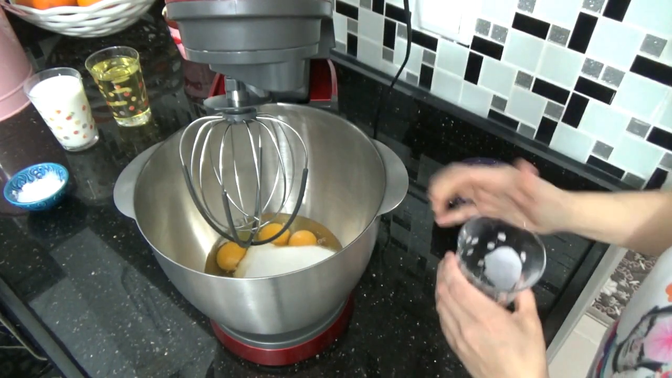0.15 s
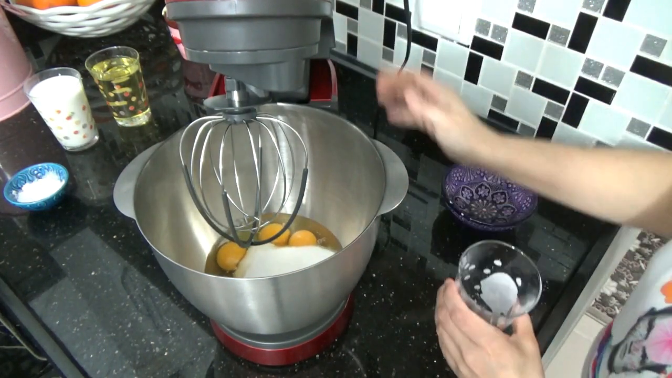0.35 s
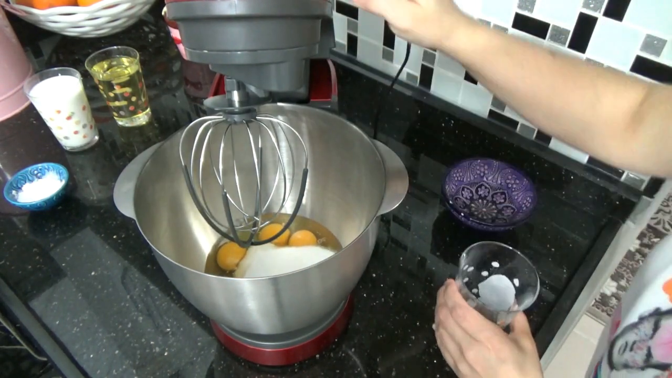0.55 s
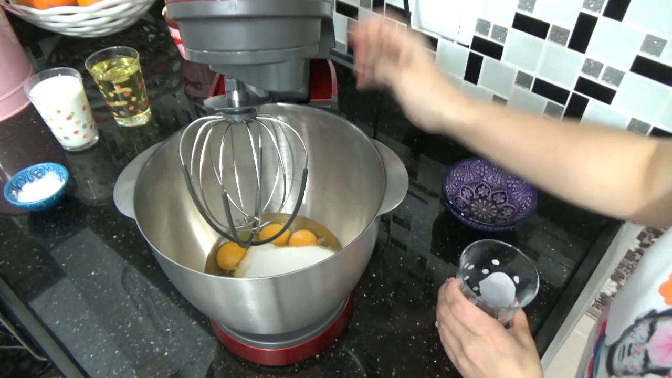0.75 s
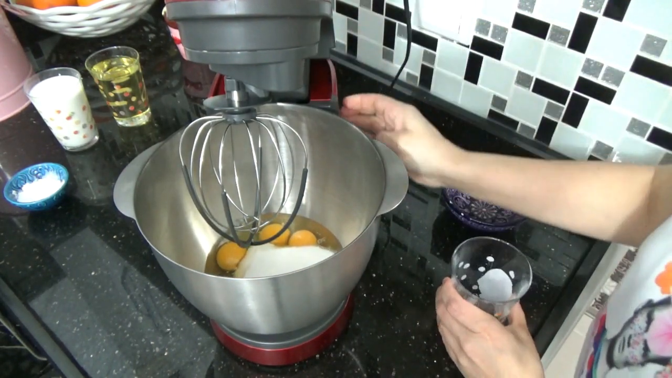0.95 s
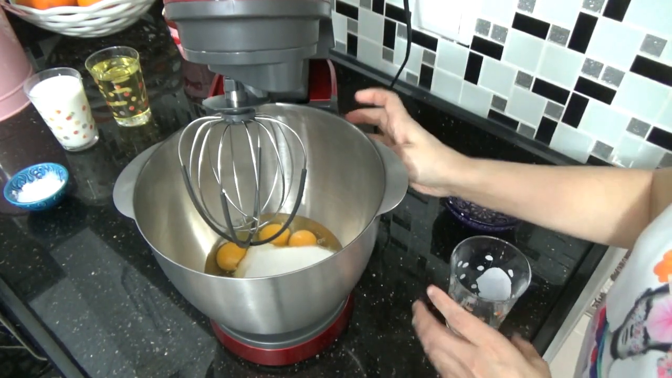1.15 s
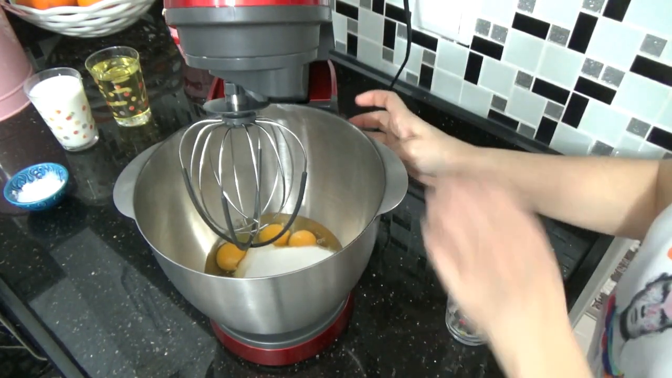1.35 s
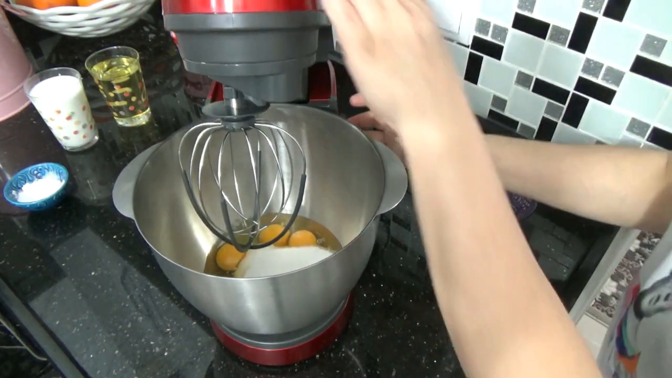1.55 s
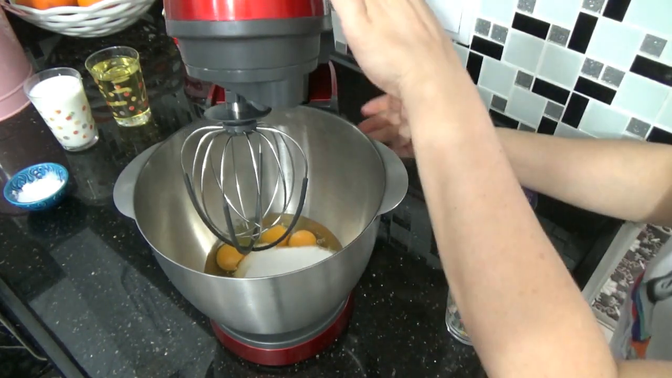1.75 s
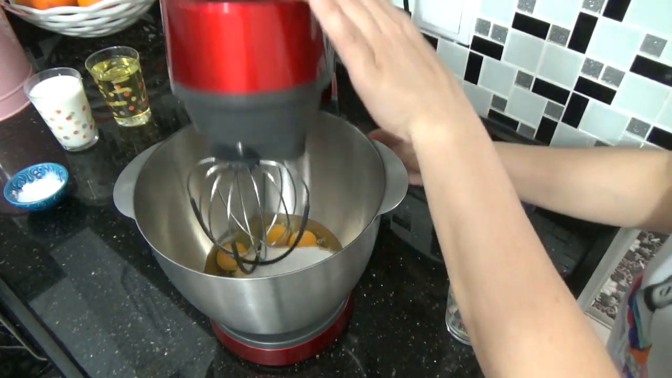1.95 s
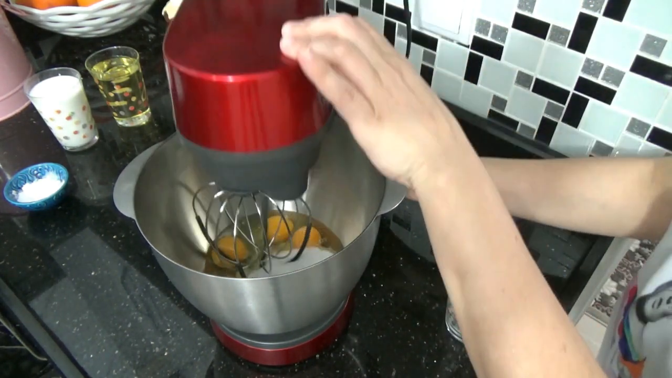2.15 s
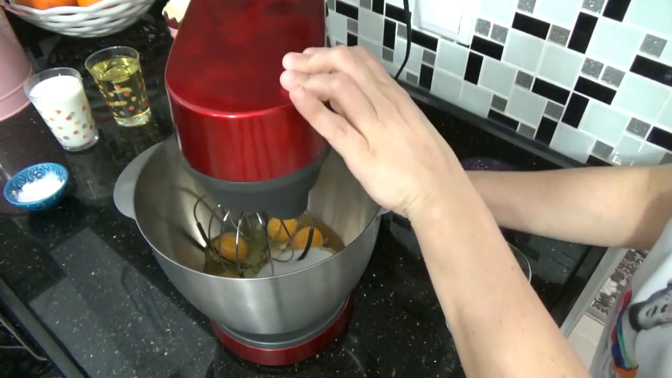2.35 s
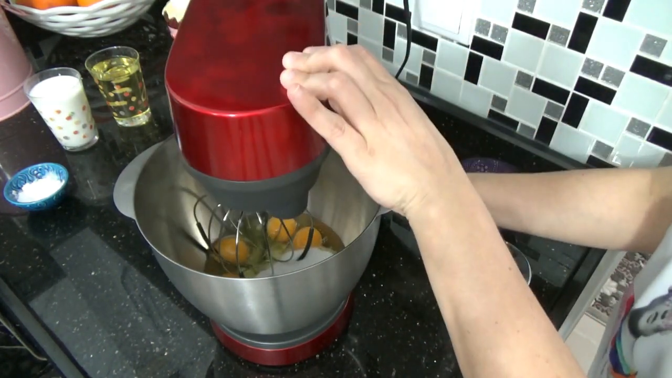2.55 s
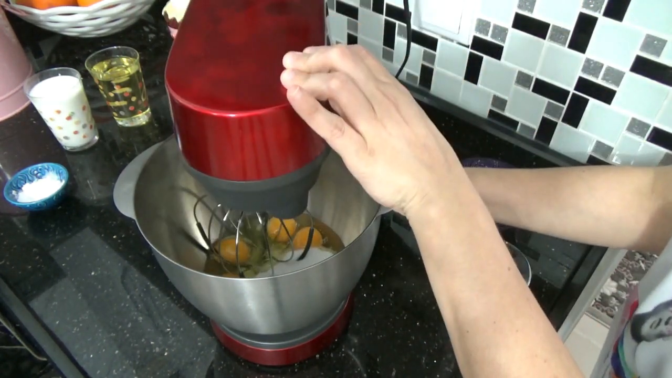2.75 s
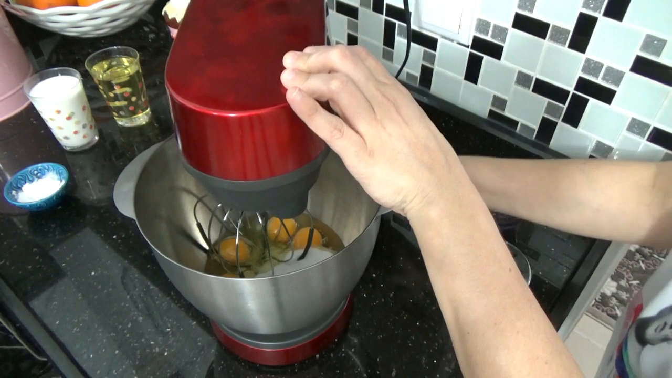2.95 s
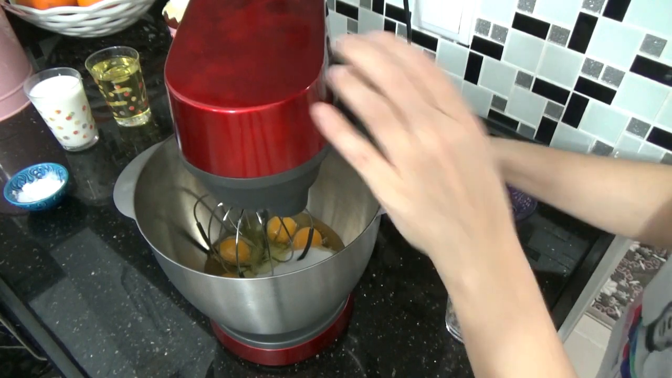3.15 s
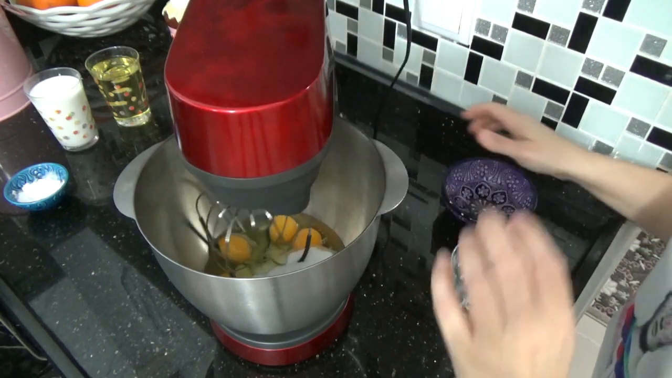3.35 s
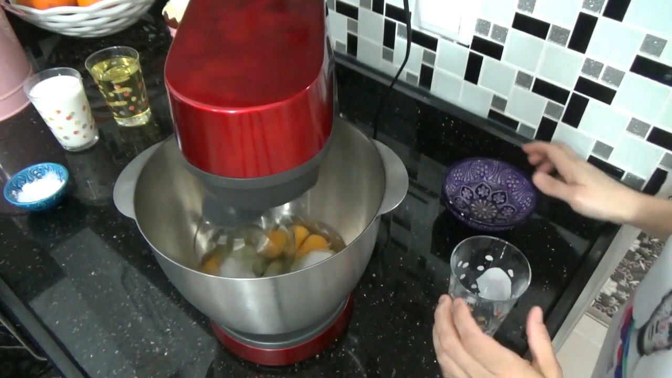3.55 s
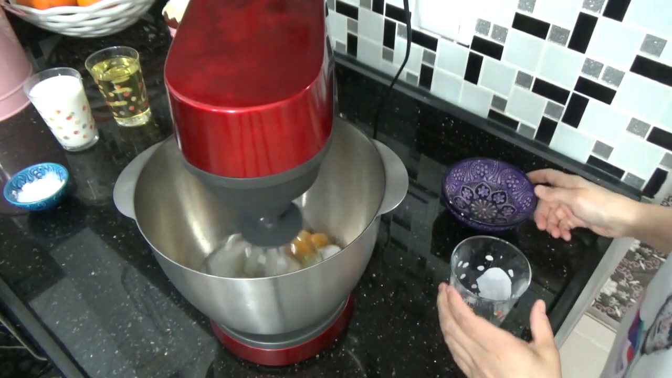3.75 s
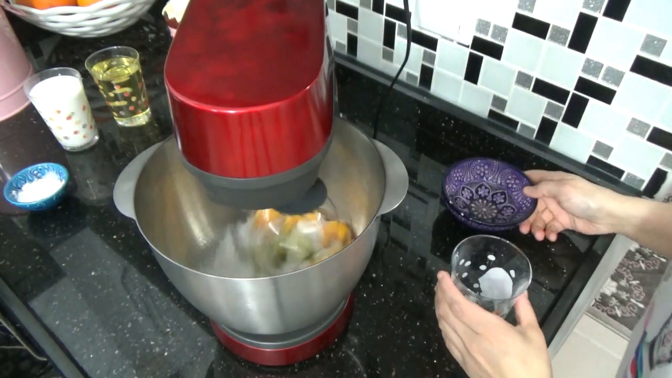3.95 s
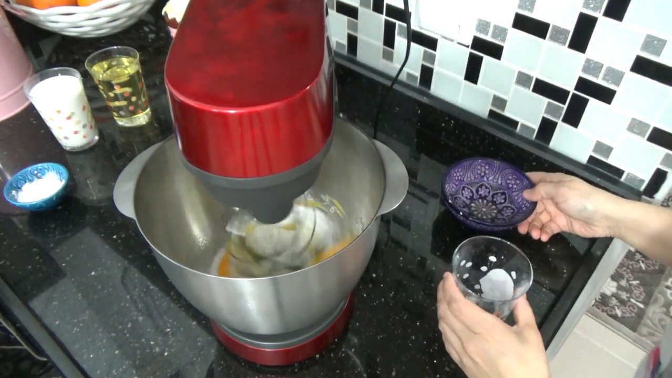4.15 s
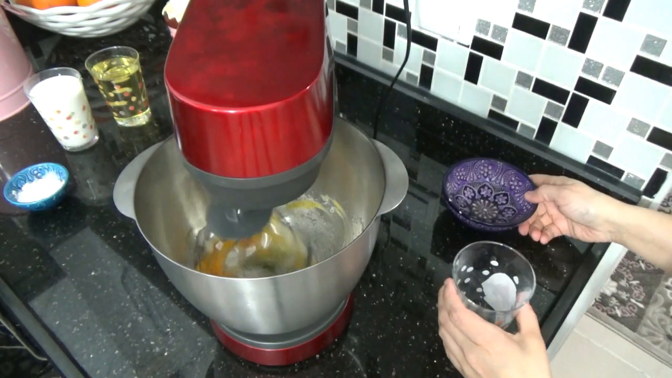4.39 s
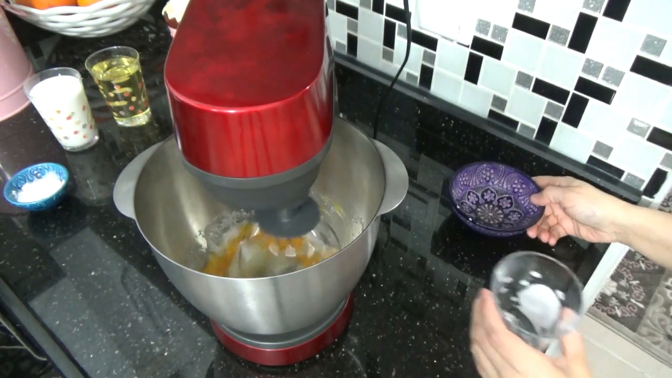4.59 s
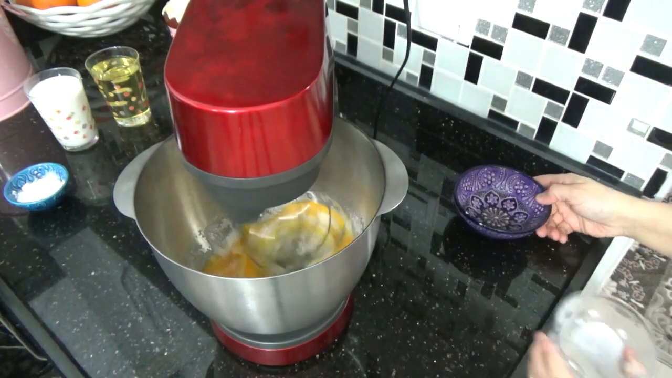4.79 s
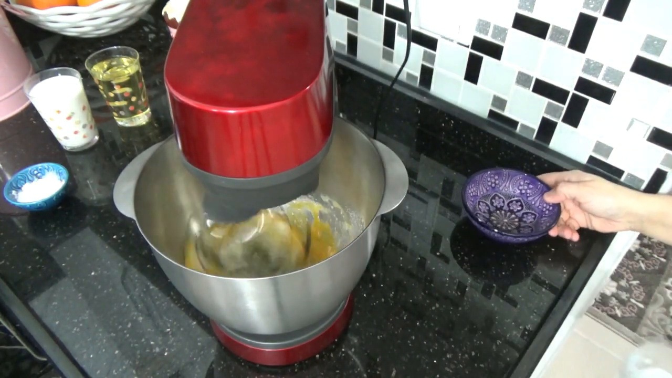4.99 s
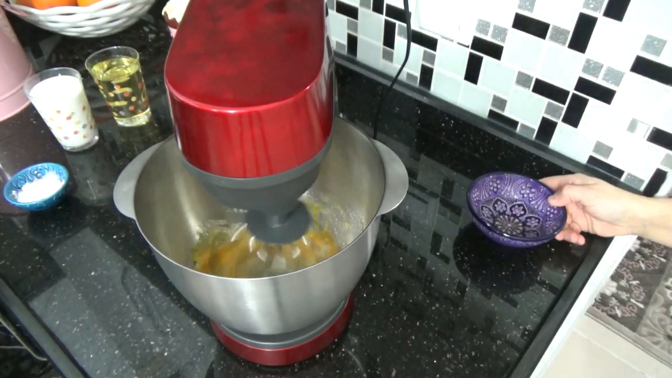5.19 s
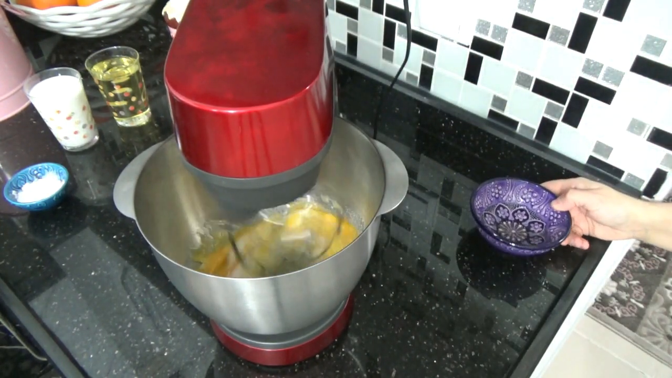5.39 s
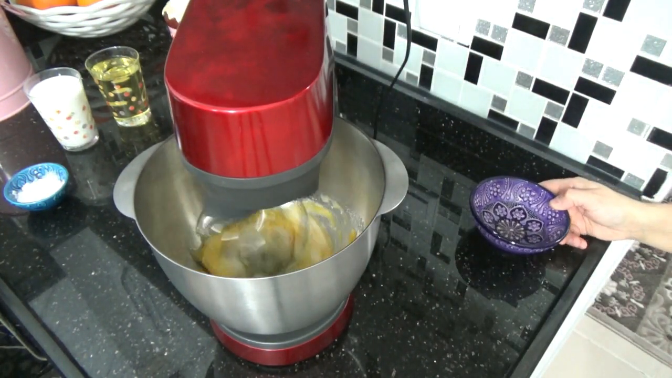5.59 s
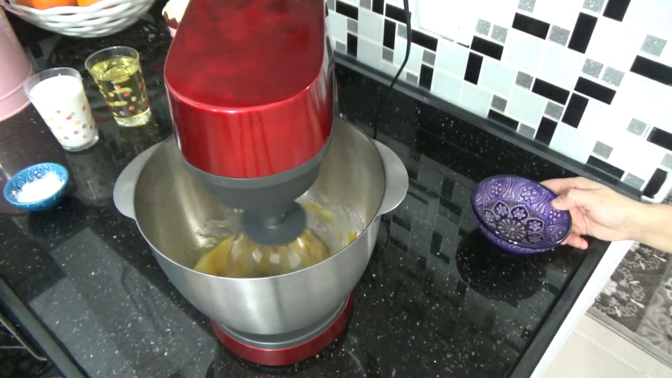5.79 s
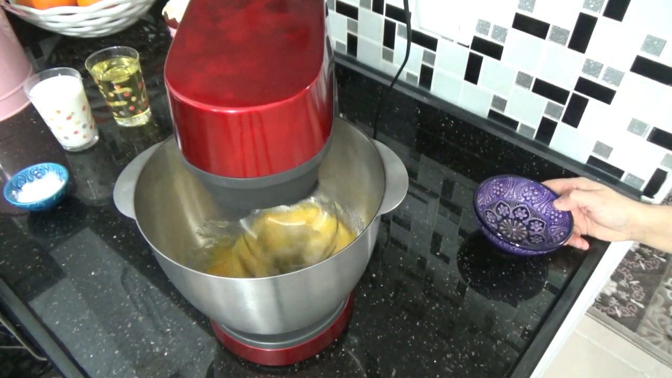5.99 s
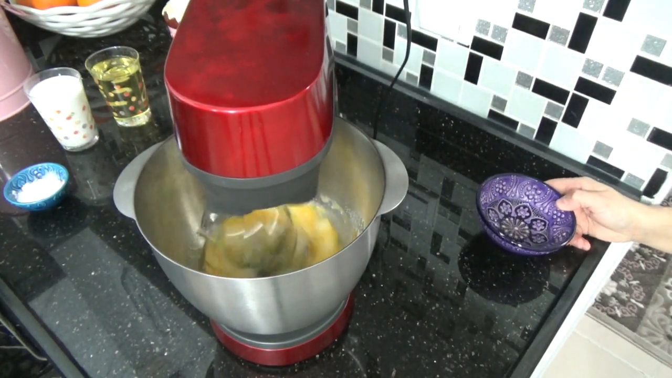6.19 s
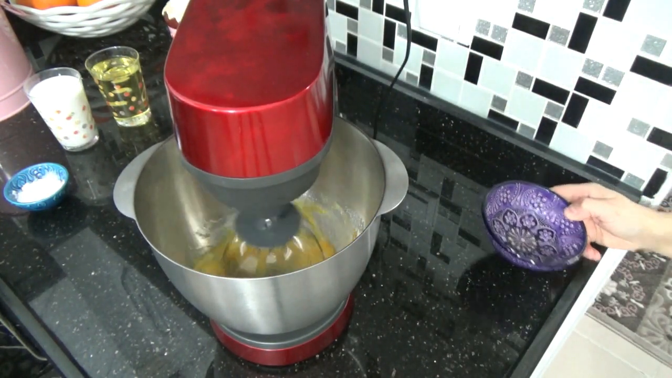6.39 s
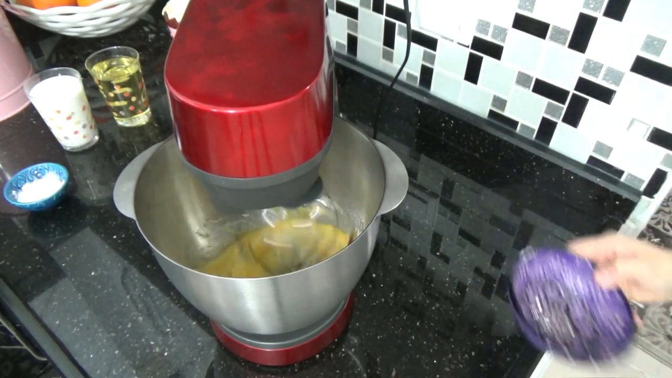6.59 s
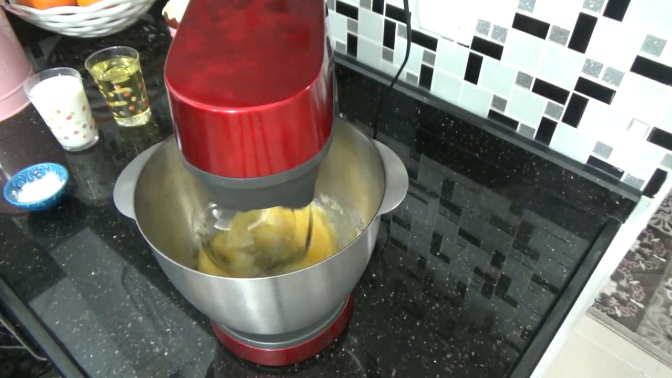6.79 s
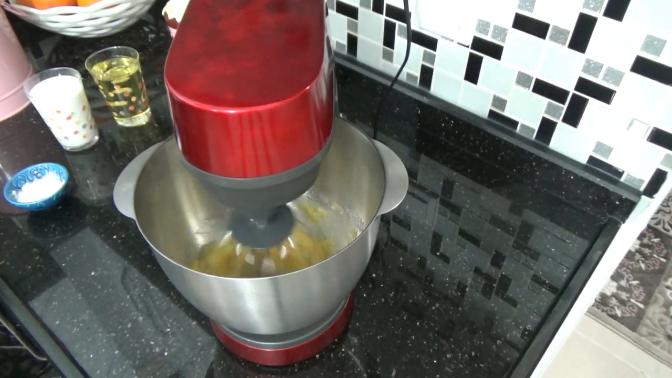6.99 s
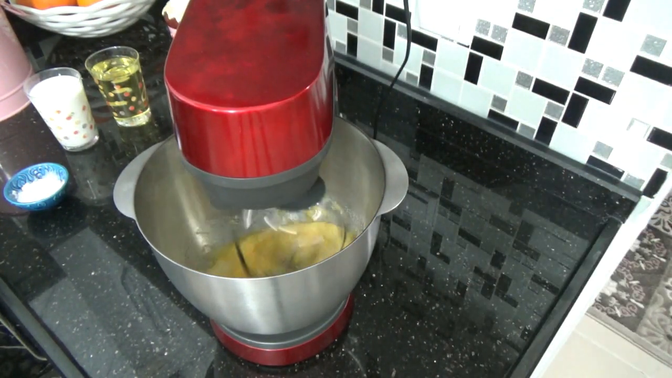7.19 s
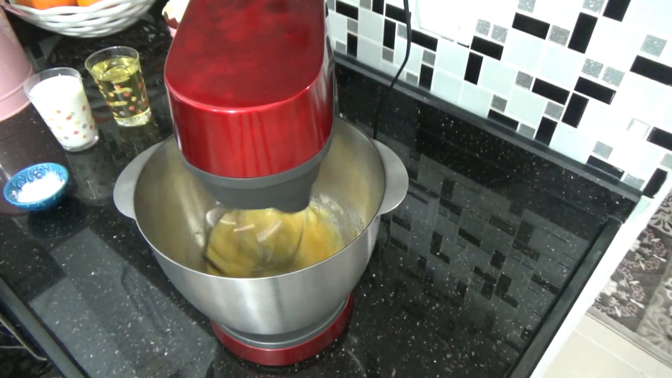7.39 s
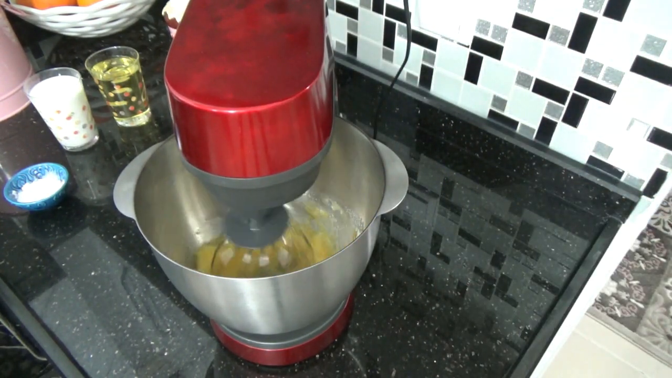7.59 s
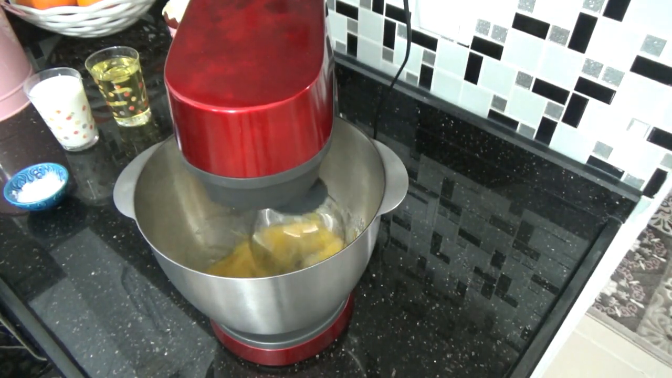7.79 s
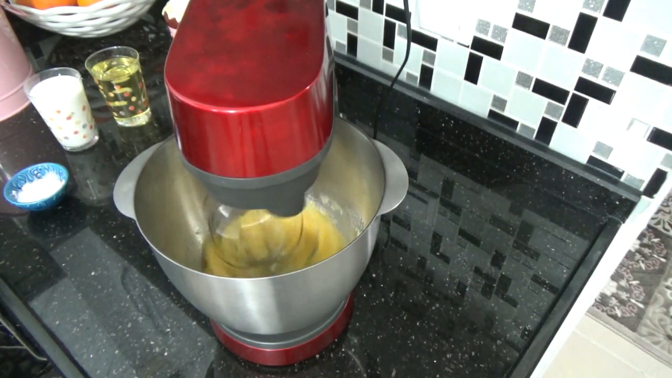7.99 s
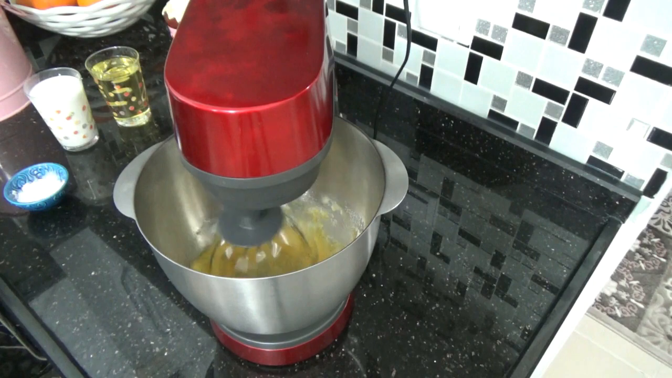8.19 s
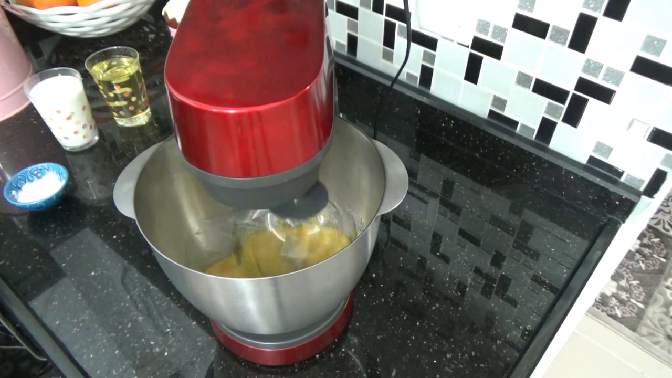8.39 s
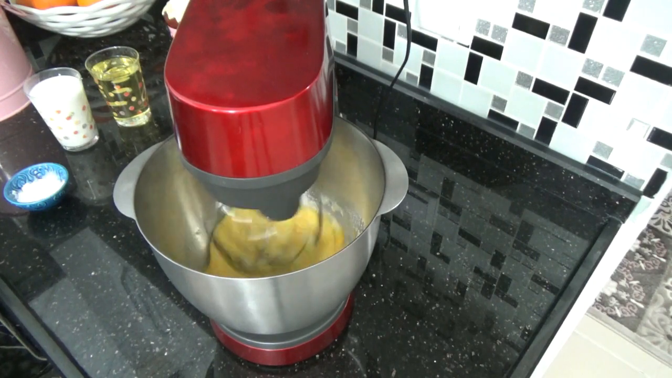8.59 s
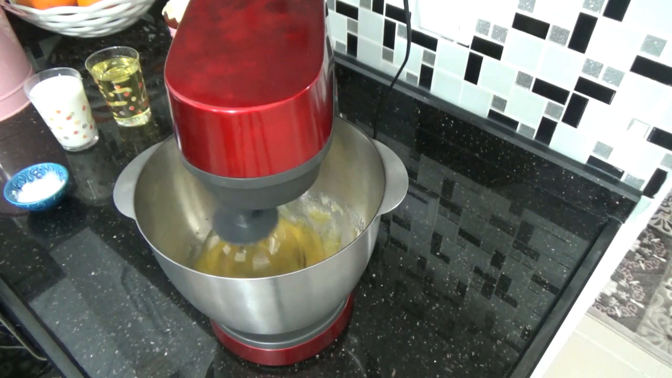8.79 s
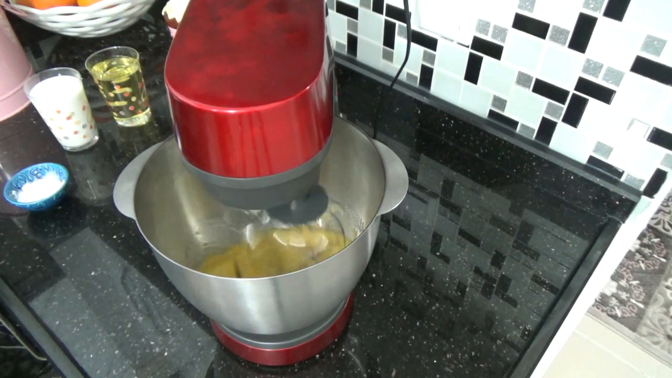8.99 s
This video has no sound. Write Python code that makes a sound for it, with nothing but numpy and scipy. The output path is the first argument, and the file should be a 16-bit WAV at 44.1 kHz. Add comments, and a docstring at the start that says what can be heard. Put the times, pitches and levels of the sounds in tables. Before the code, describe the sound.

A stand mixer's head clunks down into place, and its motor growls to life and speeds up into a steady, whining whir.

```python
"""A tiled kitchen, a stand mixer on its stone counter. A glass dish slides, the lever clacks, the head
tilts down and lands with a rattle, the knob clicks; the tiles answer each knock.
The motor growls and spins up in two steps: gears rattle and whine, brushes sing and hiss on the
commutator, and a wire whisk crunches through sugar and slaps through egg in a steel bowl.
Underneath lie room air, a low hum and a faint ticking."""
import sys
import numpy as np
from scipy import signal
from scipy.fft import rfft, irfft, next_fast_len
from scipy.io import wavfile
from scipy.ndimage import map_coordinates

SR = 44100
rng = np.random.default_rng(int(sys.argv[2]) if len(sys.argv) > 2 else 0)


def digitize_waveform(pressure):
    """Quantize a signal to 16-bit integers and store it at the path in sys.argv[1].

    Rows of a 2-D input are taken as channels; values are limited to [-1, 1].
    """
    field = np.atleast_2d(pressure).T
    bounded = np.clip(field, -1, 1)
    quanta = np.round(bounded * 32767).astype(np.int16)
    wavfile.write(sys.argv[1], SR, quanta)


N = 398663
TIME = np.arange(N) / SR
MAINS_HZ, SWITCH_ON_S = 50, 3.34
TURNS_PER_ORBIT, SAG_PHASE = 82, .75  # shaft turns per whisk orbit; share of the orbit where it drags most


def mixer():
    """One shaft drives every part of the machine; it judders while it labours below full speed."""
    speed, spun = shaft()
    pace = speed / SHAFT_SPEED[-1][1]  # share of full speed
    turns = np.cumsum(speed) / SR + 0.011 * (1 - pace) * wobble(130)
    switched_on = np.clip((TIME - SWITCH_ON_S) / 0.0072, 0, 1)
    drive = gears(turns, pace) + pinion(turns, speed, pace) + brushes(turns, speed, pace)
    return switched_on * (drive + whisk(turns, pace) + inrush(spun))


# The speed the knob calls for, low and then higher: t/s, speed/(turns/s)
SHAFT_SPEED = [(3.78, 108.0), (4.1, 104.8), (4.27, 106.5), (4.57, 115.6), (5.02, 134.1), (5.2, 137.3),
               (5.65, 136.6), (5.9, 134.6), (6.5, 134.8), (6.95, 135.3), (7.5, 135.0), (9.0, 135.0)]
def shaft(spin_up_s=.4):
    """The rotor spins up, then sags a little each orbit. Gives turns/s and the spin-up from 0 to 1."""
    setting = np.interp(TIME, *np.transpose(SHAFT_SPEED))
    spun = 1 - np.clip(1 - (TIME - SWITCH_ON_S) / spin_up_s, 0, 1) ** 1.6
    turns = np.cumsum(setting * spun) / SR
    return spun * (setting - .22 * orbit(turns, SAG_PHASE)), spun


def orbit(turns, phase):
    """Swings between 1 and -1 as the whisk circles the bowl; highest at the given share of the orbit."""
    return np.cos(2 * np.pi * (turns / TURNS_PER_ORBIT - phase))


# Pitches of the gear tones: cycles per shaft turn
GEAR_ORDERS = [1, 20 / 11, 2.06, 3.22, 50 / 11, 60 / 11, 80 / 11, 100 / 11, 10, 11.9, 13.47, 14.22, 15.47,
               23.25, 24.75]
# Balance of those tones: level/dB
GEAR_LEVELS = [-64, -36, -44.5, -36.5, -31, -32, -32.5, -32.5, -39.5, -34.5, -34, -49, -35, -41.5, -44]
def gears(turns, pace):
    """Tooth impacts rattle the housing; the meshes add tones that grow with speed and swell under load."""
    contacts = 10 / 11 * turns  # planet teeth meeting
    impacts = rng.standard_normal((2, N)) * throb(contacts, depth=.25) * throb(3 * contacts, depth=.15)
    load_db = 0.94 * orbit(turns, phase=0.51)
    labour_db = 2 * (1 - pace)
    level = amp(-18.5 + load_db + labour_db) * np.clip(pace / 0.63, 0, 1) ** 1.56
    rattle = level * unit(filtered(impacts * amp(0.43 * wobble(45)), housing))
    tones = sum(amp(db) * tone(order * turns, flutter=0.56, flutter_hz=14, width=1.0)
                for order, db in zip(GEAR_ORDERS, GEAR_LEVELS))
    # the rotor's unbalance shakes the stand most near three quarters of full speed
    shake = np.exp(-((pace - .78) / 0.11) ** 2)
    unbalance = amp(-55.5) * shake * tone(turns, flutter=0.34, flutter_hz=20, width=0.42)
    return rattle + tones * pace ** 7 * amp(1.9 * orbit(turns, SAG_PHASE)) + unbalance


# Broad, mid-heavy colour of the casing: f/Hz, level/dB
CASING_COLOUR = [(35, -62), (60, -51), (172, -20.5), (249, -7), (445, -7), (530, -16.5), (610, -3),
                 (678, -3.5), (740, -4), (1440, -3.5), (1750, -7), (1910, -5.5), (2860, -9.5),
                 (3240, -12.5), (4000, -25.5), (5200, -47), (8800, -120)]
# Resonances of casing and bowl: f/Hz, width/Hz, boost/dB
BODY_PEAKS = [(264.5, 51.3, 8), (498, 98, 7.5), (940, 240, 4), (1200, 72, 3.5), (1350, 63, -1.5),
              (1716, 75, 8), (2000, 45, 3.5), (2860, 570, -6)]
def housing(hz):
    """Casing and bowl act as an EQ on the rattle: a broad curve with resonant peaks."""
    peaks_db = sum(resonance(hz, *peak) for peak in BODY_PEAKS)
    return amp(along(CASING_COLOUR, hz) + peaks_db)


def pinion(turns, speed, pace, teeth=13):
    """The pinion's whine grows with speed, swells once per orbit and flares at the gearbox resonance."""
    flare_db = resonance(teeth * speed, centre_hz=1387, width_hz=43, boost_db=9)
    swell_db = 3.5 * orbit(turns, phase=1) * pace ** 4
    level = amp(-25 + swell_db + flare_db) * pace ** 1.5
    return level * tone(teeth * turns, flutter=0.32, flutter_hz=55.26, width=1.0)


# How the casing passes the commutator's harmonics: f/Hz, level/dB
WHISTLE_COLOUR = [(1200, -44.5), (1650, -36), (2200, -21), (2550, -35), (3240, -32.5), (3900, -40),
                  (4860, -39), (5100, -49), (5650, -32.5), (6450, -38.5), (7600, -36), (8100, -31.5),
                  (8850, -35), (9650, -38.5), (10150, -37), (11300, -46.5), (13000, -53), (15500, -60)]
# Bright scrape of the brushes: f/Hz, level/dB
BRUSH_COLOUR = [(1470, -14), (2500, -8.5), (3250, -4.5), (3820, -8.5), (5200, -7.5), (7650, -6.5),
                (8330, -3.5), (8660, -4.5), (13400, -19.5), (15800, -28)]
def brushes(turns, speed, pace, segments=12):
    """Brushes scrape the commutator: a whistle, a buzz that repeats each turn, pulsing hiss and hum."""
    mains = 2 * MAINS_HZ * TIME  # the current peaks twice per cycle
    flicker_db = 10 * np.clip(1 - pace, 0, .25)  # each partial flickers more below full speed
    whistle = np.zeros((2, N))
    for order in segments * np.arange(2, 11):
        partial_db = along(WHISTLE_COLOUR, order * speed) + 2.2 * wobble(6) + flicker_db * wobble(28)
        whistle += amp(partial_db) * tone(order * turns, flutter=.32, flutter_hz=40, width=.5)
    # uneven segments shake the whistle once a turn, the current at each of its peaks
    whistle *= throb(turns, depth=0.086) * throb(mains, depth=0.232)
    whistle_level = amp(0.5) * pace ** 0.81 * np.clip(speed / 105, 0, 1) ** 3
    surface = irfft(np.exp(2j * np.pi * rng.random(128)), 4096)  # roughness around the commutator
    buzz = coloured(np.interp(turns % 1, np.linspace(0, 1, len(surface)), surface), BRUSH_COLOUR)
    hiss = noise(BRUSH_COLOUR) * throb(turns, depth=0.045) * throb(mains, depth=0.11)
    hiss *= amp(1.13 * wobble(30))
    hiss[0] += amp(-5) * buzz  # dead centre
    hum = amp(-54.5) * tone(mains, flutter=0.154, flutter_hz=7.8, width=0.31)
    return whistle_level * whistle + amp(-27) * pace ** 1.04 * hiss + hum


# Growl of the slow rotor under its starting current: f/Hz, level/dB
GROWL_COLOUR = [(90, -24), (250, -10), (420, -2), (560, 4), (720, -4), (1100, -9), (1700, -37), (2200, -9),
                (2800, -38), (6000, -50)]
def inrush(spun):
    """The starting current shakes the stator twice per mains cycle, fading as the rotor reaches speed."""
    shaking = rng.standard_normal((2, N)) * throb(2 * MAINS_HZ * TIME, depth=0.23)
    current = 1 - spun ** 4.5
    return amp(-29.5) * current * coloured(shaking, GROWL_COLOUR)


# Wet splatter of egg flung off the wires: f/Hz, level/dB
EGG_COLOUR = [(300, -32.5), (600, -5), (1000, -20), (1500, 0), (2000, -2), (2400, 1.5), (2900, -7),
              (3600, -7.5), (6000, -14), (12000, -49)]
def whisk(turns, pace):
    """The wires slap through the egg, hardest once per orbit."""
    slaps = unit(noise(EGG_COLOUR) * amp(3.3 * wobble(110)))
    sweep = throb(turns / TURNS_PER_ORBIT - 0.57, depth=1.0)
    return amp(-32) * pace * slaps * sweep


# The wires plough through dry sugar: t/s, relative level/dB, half-width/s
SUGAR_STROKES = [(3.432, -37, 0.0077), (3.482, -23.5, 0.0125), (3.531, -29, 0.013), (3.568, -26.5, 0.0072),
                 (3.675, -23.5, 0.016), (3.778, -26, 0.0089), (3.849, -32, 0.0113), (4.13, -27, 0.0152)]
# Crisp grit of the grains: f/Hz, level/dB
SUGAR_COLOUR = [(1500, -24), (3500, -1.5), (6000, -4), (8400, 5.5), (10500, -7), (15000, -23)]
def sugar():
    """Each pass of the wires crunches grains against the bowl until the egg wets them."""
    return amp(3.5) * swells(SUGAR_STROKES) * unit(noise(SUGAR_COLOUR) * amp(2.6 * wobble(700)))


# Hits of lever, head and knob: t/s, clack/dB, thump/dB, tick/dB, ring/dB
HITS = [(.802, -11, -38, -27, -28), (.828, -20.5, -26.5, -40, -46.5), (1.004, -13.5, -34, -28, -31),
        (1.012, -16.5, -24, -32, -27), (1.163, -24, -28, -27, -44), (1.361, -45, -37, -61, -59),
        (1.374, -49, -36.5, -61, -54), (1.548, -43, -36, -52, -65), (1.573, -39, -37, -52, -61),
        (1.694, -23, -21.5, -36, -44), (1.795, -50, -36.5, -66, -62), (2.262, -28.5, -45.5, -20, -57),
        (2.318, -23.5, -30, -15.5, -46.5), (2.604, -35.5, -57, -38, -65.5), (2.685, -41, -57, -50, -63),
        (2.836, -36, -37.5, -35.5, -60), (2.959, -34.5, -33.5, -47, -58), (3.071, -26.5, -26, -43.5, -37),
        (3.341, -37, -35, -40, -50)]
# Low body of a hit: f/Hz, level/dB
THUMP_COLOUR = [(60, -40), (175, -23), (245, 3), (310, 1), (420, -1), (650, 1), (1000, 1), (1350, -1),
                (1700, -8.5), (3000, -54)]
# Its hard midrange: f/Hz, level/dB
CLACK_COLOUR = [(300, -32.5), (560, -15), (760, 9.5), (900, 4), (1300, -6), (1800, 1.5), (2300, -1),
                (3500, -3), (5000, -13.5), (8000, -80.5)]
# Its bright edge: f/Hz, level/dB
TICK_COLOUR = [(2000, -12), (4500, 2), (6500, 0.5), (8200, 3.5), (10000, -3.5), (12000, -14), (15800, -17)]
# Hollow note of the head's casing: f/Hz, level/dB, t60/s
HEAD_MODES = [(254, -2, 0.11), (326.63, -4, 0.29), (474, -3, 0.118), (638.5, -5, 0.25), (760, -4, 0.2)]
# Ring of the mixer's frame: f/Hz, level/dB, t60/s
FRAME_MODES = [(747, -6, 0.42), (805, -2.5, 0.31), (857, 4, 0.14), (1089, -4, 0.26), (1170, 0, 0.338),
               (1746, -5, 0.18), (2100, -9.5, 0.36), (2305, -5, 0.23), (3314, -21, 0.226),
               (3752, -20.5, 0.16)]
def knocks():
    """Each contact is a hollow thump, a hard clack and a tick, and rings the frame."""
    out = np.zeros((2, N + SR))
    t = np.arange(SR // 3) / SR

    def burst(colour, t60, rise_s):
        return noise(colour, size=len(t)) * amp(-60 * t / t60) * (1 - np.exp(-t / rise_s))

    for start_s, clack_db, thump_db, tick_db, ring_db in HITS + landing():
        thump = burst(THUMP_COLOUR, t60=0.14, rise_s=0.00091) + amp(-7.5) * ringing(HEAD_MODES, t)
        clack = burst(CLACK_COLOUR, t60=0.084, rise_s=0.0013)
        tick = burst(TICK_COLOUR, t60=0.049, rise_s=0.0005)
        ring = amp(-1) * ringing(FRAME_MODES, t)
        hit = amp(thump_db) * thump + amp(clack_db) * clack + amp(tick_db) * tick + amp(ring_db) * ring
        start = round(start_s * SR)
        out[:, start:start + len(t)] += hit
    return out[:, :N]


def landing(start_s=2.334, gap_s=.0182):
    """The head lands and chatters on its stop: five hits, each duller than the last."""
    first_db = np.array([-13.5, -19.5, -17.5, -33])  # clack, thump, tick, ring
    step_db = np.array([-0.94, 0.43, -3, -1])
    return [(start_s + k * gap_s, *(first_db + k * step_db)) for k in range(5)]


def ringing(modes, t):
    """Struck modes ring out, at new strengths for every blow."""
    hz, db, t60 = np.transpose(modes)[:, :, None]
    angle = 2 * np.pi * (hz * t + rng.random((2, len(modes), 1)))
    decay = amp(db + rng.normal(0, 1.8, db.shape) - 60 * t / t60)
    return (decay * np.sin(angle)).sum(axis=1) * (1 - np.exp(-t / 0.00088))


# The head swings, rubs into its seat, and the hand shifts on it: t/s, relative level/dB, half-width/s
HINGE_RUBS = [(2.03, -48, 0.1), (2.3, -42, 0.051), (3.0, -54.5, 0.29)]
def hinge():
    """Soft rubs as the head swings down, in the same colours as its knocks."""
    rub = amp(1.5) * noise(THUMP_COLOUR) + amp(-3.5) * noise(CLACK_COLOUR) + amp(-9) * noise(TICK_COLOUR)
    return swells(HINGE_RUBS) * rub


# One short slide of a small dish: t/s, level/dB, half-width/s
DISH_SLIDE = [(.11, -53, 0.051)]
# Thin, high song of glass on stone: f/Hz, level/dB
GLASS_COLOUR = [(3000, -31), (6000, -17.5), (6550, -9.5), (7200, -18), (8000, -9.5), (8300, 1), (8650, -13),
                (9300, -11.5), (12500, -19), (15800, -27.5)]
def dish():
    """Glass judders over the polished counter."""
    return swells(DISH_SLIDE) * unit(noise(GLASS_COLOUR) * amp(2.5 * wobble(150)))


# Reverb time of the tiled room: f/Hz, t60/s
ROOM_DECAY = [(150, 0.39), (400, 0.57), (1040, 0.48), (2760, 0.38), (7280, 0.3), (15000, 0.31)]
def kitchen(x):
    """Tiles and stone answer after a few milliseconds; treble dies first."""
    hz, t, spectra = signal.stft(rng.standard_normal((2, SR * 3 // 4)), SR, nperseg=256)
    envelope = amp(-60 * t / along(ROOM_DECAY, hz)[:, None]) * (1 - np.exp(-t / 0.0081))
    tail = signal.istft(spectra * envelope, SR, nperseg=256)[1]
    return signal.fftconvolve(x[:1], tail / np.linalg.norm(tail[0]), axes=1)[:, :N]


# Dark room tone: f/Hz, level/dB
AIR_COLOUR = [(15, -38), (25, -25), (55, -11), (116, -13), (133, -8.5), (152, -5.5), (174, -13), (205, -7),
              (324, -9.5), (486, -11.5), (2460, -26), (14200, -40.5), (15800, -45)]
def background(tick_gap_s=.08):
    """Still room air, a low hum and a faint, regular ticking."""
    ticking = noise([(1500, -25), (3000, 0), (5000, -10), (9000, -25)])
    ticking *= amp(-60 * (TIME % tick_gap_s) / .02)
    air = noise(AIR_COLOUR)
    hum = tone(MAINS_HZ * TIME, flutter=0.17, flutter_hz=4, width=0.28)
    return amp(-49.5) * air + amp(-61.5) * hum + amp(-50) * ticking


# Stereo image, narrow above the deep bass: f/Hz, left-right likeness (1 = mono)
LIKENESS = [(60, 0.45), (130, 0.97), (290, 0.93), (640, 0.84), (1410, 0.8), (3100, 0.86), (6820, 0.87),
            (15000, 1)]
def spread(pair):
    """Two unrelated rows, weighted as mid and side, become left and right."""
    def weights(hz):
        angle = np.arccos(np.clip(along(LIKENESS, hz), -1, 1)) / 2
        return np.array([np.cos(angle), np.sin(angle)])

    mid, side = filtered(pair, weights)
    return np.array([mid + side, mid - side])


def tone(cycles, flutter, flutter_hz, width):
    """A machine tone as mid and side, with random flutter in size and phase."""
    angle = 2 * np.pi * (cycles + rng.random())
    cos, sin = np.cos(angle), np.sin(angle)
    knots = rng.standard_normal((2, int(N * flutter_hz / SR) + 2))
    size, phase = (np.interp(TIME, np.arange(len(row)) / flutter_hz, row) for row in knots)
    mid = unit(cos + flutter * (size * cos - phase * sin))
    side = width * (size * sin + phase * cos)
    return np.array([mid, side])


def throb(cycles, depth):
    """A gain that peaks once per cycle."""
    return unit(np.exp(depth * np.cos(2 * np.pi * cycles)))


def swells(strokes):
    """A bell-shaped fade in and out around each stroke."""
    return sum(amp(db) * np.exp(-.5 * ((TIME - s) / half_width) ** 2) for s, db, half_width in strokes)


def wobble(rate):
    """A smooth random curve, rate knots a second."""
    knots = rng.standard_normal(int(N * rate / SR) + 4)
    steps = np.arange(0, len(knots) - 1, 1 / 8)
    return np.interp(TIME * rate, steps, map_coordinates(knots, [steps]))


def noise(colour, size=N):
    """Coloured noise of rms 1, two unrelated rows."""
    return coloured(rng.standard_normal((2, size)), colour)


def coloured(x, colour):
    """x through an EQ curve of (Hz, dB) points, at rms 1."""
    return unit(filtered(x, lambda hz: amp(along(colour, hz))))


def filtered(x, response):
    """x through a gain that depends on frequency."""
    size = x.shape[-1]
    padded = next_fast_len(size + 8192)
    return irfft(rfft(x, padded) * response(np.fft.rfftfreq(padded, 1 / SR)), padded)[..., :size]


def resonance(hz, centre_hz, width_hz, boost_db):
    """The lift in dB from one resonant peak."""
    return boost_db / (1 + (2 * (hz - centre_hz) / width_hz) ** 2)


def along(points, hz):
    """Reads a curve of (Hz, value) points on a log frequency axis."""
    freqs, values = np.transpose(points)
    return np.interp(np.log(hz + 1), np.log(freqs + 1), values)


def amp(db):
    """Decibels to gain."""
    return np.exp(np.asarray(db) * (np.log(10) / 20))


def unit(x):
    """Scaled to rms 1."""
    return x / np.sqrt(np.mean(x ** 2) + 1e-20)


def scene():
    """Everything on the counter, heard from just above it; only the knocks feed the reverb."""
    handling = knocks()
    reverb = amp(-5.5) * kitchen(handling)
    mix = handling + reverb + hinge() + mixer() + sugar() + dish() + background()
    return spread(mix) * amp([[-.3], [.4]])  # leans slightly right


def record(dry, ceiling=.7, top_hz=15850):
    """A soft clip rounds off the highest peaks, then a steep low-pass cuts the very top."""
    rounded = dry / (1 + np.abs(dry / ceiling) ** 6) ** (1 / 6)
    return filtered(rounded, lambda hz: hz < top_hz)


dry = scene()
out = record(dry)
digitize_waveform(out)
```